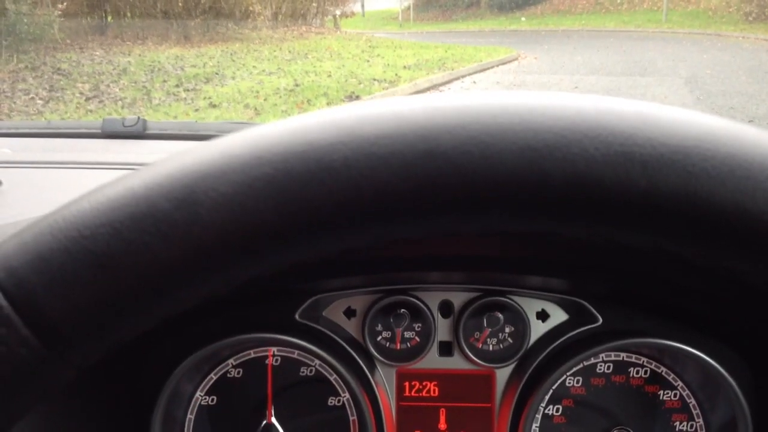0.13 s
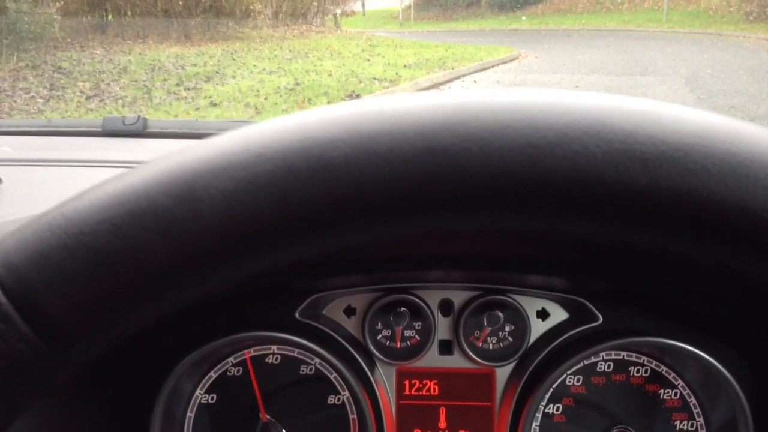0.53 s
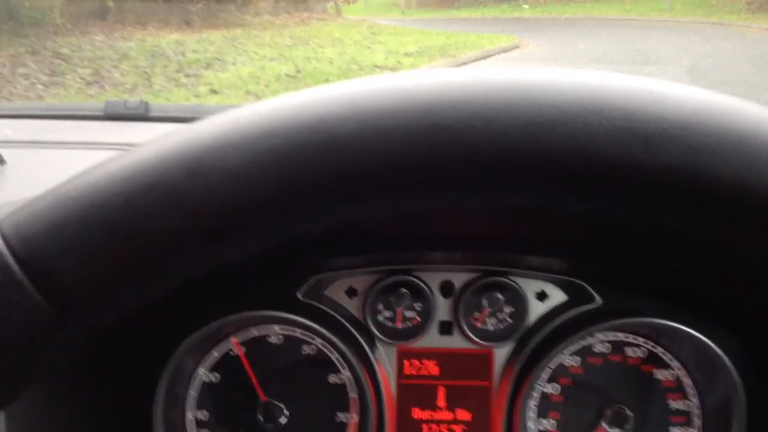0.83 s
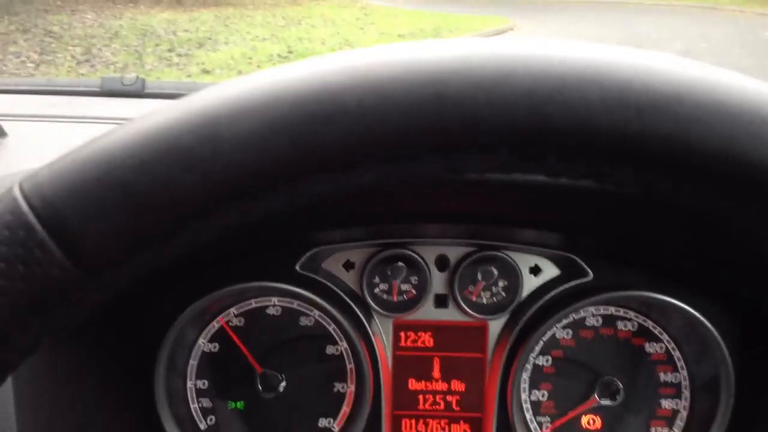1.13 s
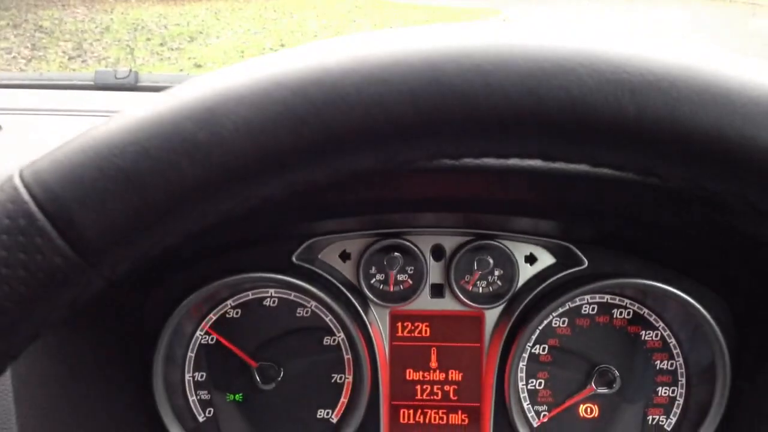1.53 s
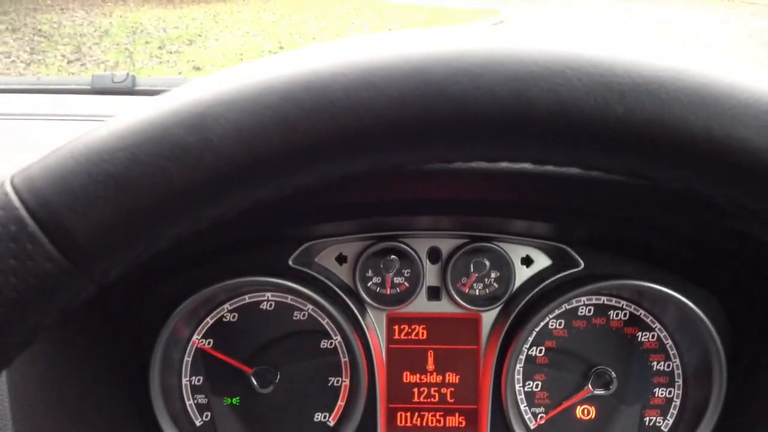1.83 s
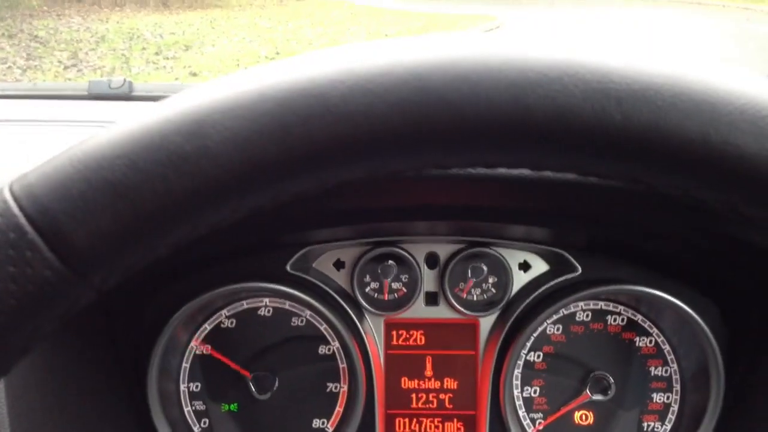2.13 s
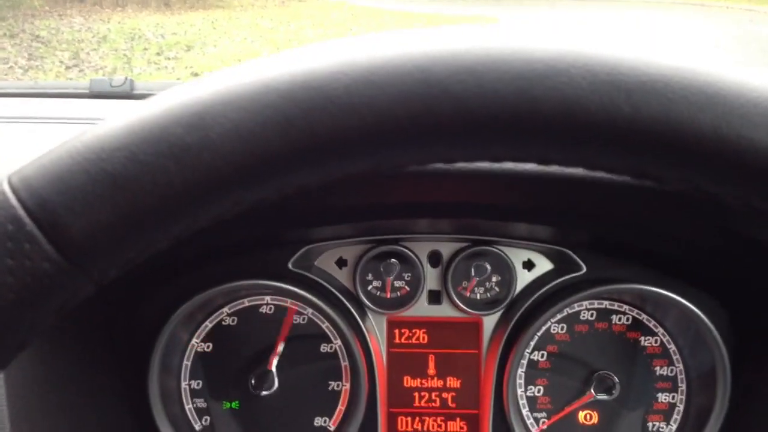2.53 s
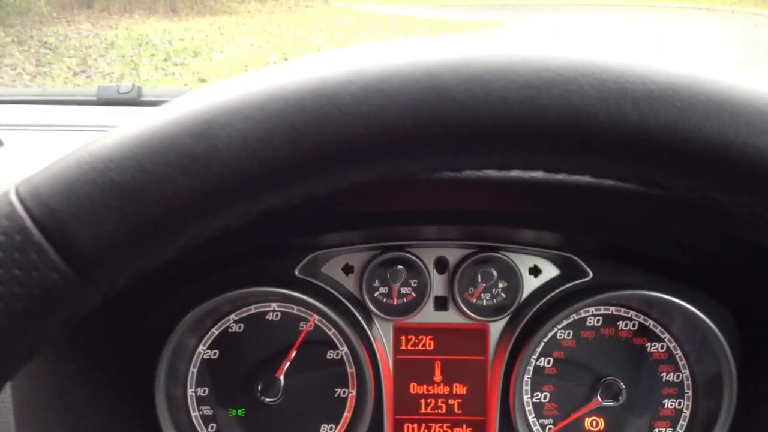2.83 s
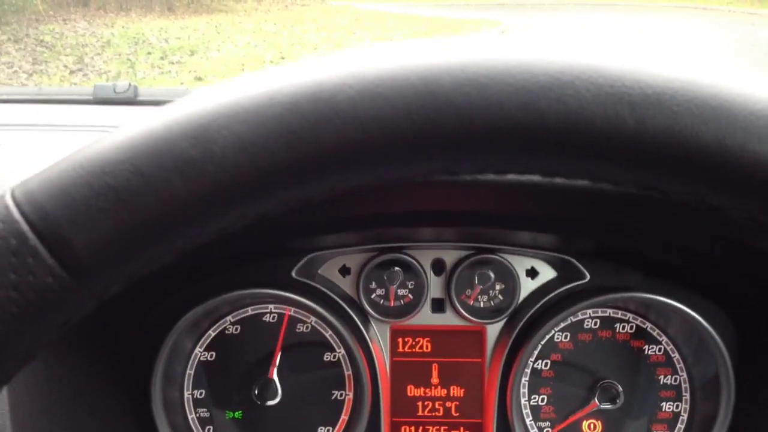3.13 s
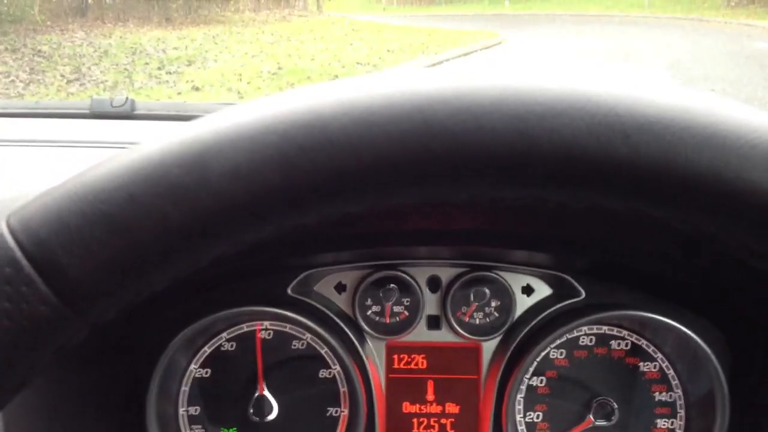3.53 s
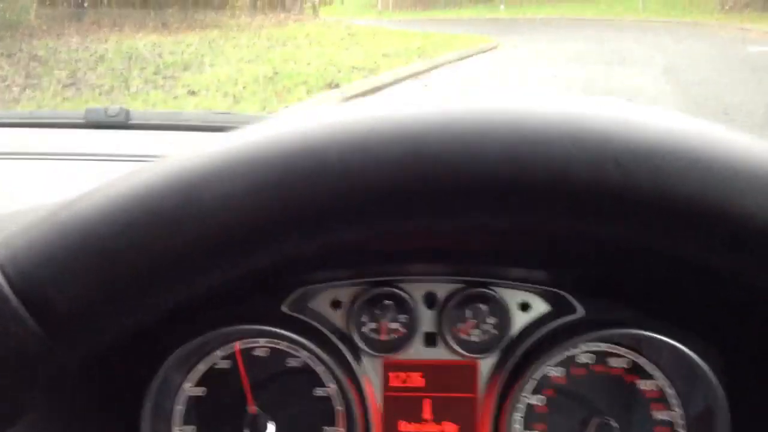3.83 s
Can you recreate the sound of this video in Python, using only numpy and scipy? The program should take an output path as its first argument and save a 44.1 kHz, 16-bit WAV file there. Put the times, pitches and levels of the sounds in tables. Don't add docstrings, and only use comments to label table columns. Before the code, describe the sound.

A muffled car engine coasts down and grumbles low, a pedal squeaks faintly, the revs surge into a roar, then a falling valve hiss and burbling coast-down, recorded in a small, boomy, enclosed cabin with slight microphone hiss.

```python
import sys
import numpy as np
from scipy import signal
from scipy.fft import rfft, irfft
from scipy.io import wavfile
from scipy.ndimage import uniform_filter1d

SR = 44100
rng = np.random.default_rng(int(sys.argv[2]) if len(sys.argv) > 2 else 0)


def gain_from_decibels(decibels):
    exponent = np.asarray(decibels, float) / 20
    return 10 ** exponent


def wrap_up_sound(samples):
    columns = np.atleast_2d(samples).T
    tamed = np.clip(columns, -1, 1)
    steps = np.round(tamed * 32767).astype(np.int16)
    wavfile.write(sys.argv[1], SR, steps)


N = 176400
T = np.arange(N) / SR


def evened(x):
    return x / np.sqrt(np.mean(x ** 2) + 1e-20)


def control(table, col):
    rows = np.array(table, float)
    return uniform_filter1d(np.interp(T, rows[:, 0], rows[:, col]), size=800)


def resonate(x, hz, width_hz):
    turn = np.exp(2j * np.pi * np.cumsum(hz * np.ones(len(x))) / SR)
    r = np.exp(-np.pi * width_hz / SR)
    return 2 * (turn * signal.lfilter([1 - r], [1, -r], x / turn)).real


def bank(x, peaks, glide=1):
    out = 0
    for hz, width_hz, level_db in peaks:
        once = resonate(x, hz * glide, width_hz)
        out = out + gain_from_decibels(level_db) * evened(resonate(once, hz * glide, width_hz))
    return out


def noise(points, patch_db=0):
    frames, hz = N // 256 + 5, np.fft.rfftfreq(1024, 1 / SR)
    real, imag, patch = rng.standard_normal((frames, 513, 3)).T
    patch = uniform_filter1d(patch, size=10, axis=0)
    patch = evened(uniform_filter1d(patch, size=12, axis=1))
    point_hz, point_db = np.transpose(points)
    level_db = np.interp(np.log(hz + 1), np.log(point_hz + 1), point_db, -90, -90)
    z = (real + 1j * imag) * gain_from_decibels(level_db[:, None] + patch_db * patch)
    return evened(signal.istft(z, nperseg=1024, noverlap=768)[1][:N])


def bump(start_s, length_s, skew=1):
    return np.sin(np.pi * np.clip((T - start_s) / length_s, 0, 1) ** skew) ** 2


def drift(hz, count):
    b, a = signal.butter(2, hz, fs=SR / 200)
    return evened(signal.lfilter(b, a, rng.standard_normal(count)))


# centre_hz, width_hz, level_db
CABIN_MODES = [(80, 16, -10.5), (135.7, 49.4, 1), (162.9, 9.8, 2), (207.1, 7.1, -8), (230.7, 15.3, 1),
               (255.7, 6.1, -1.5), (290, 22, -2.5), (347.6, 20.4, 3), (410.4, 52, -6.5), (533, 73, -12),
               (635, 64, -8), (699, 30, -16), (792, 44, -15.5), (877, 34, -6), (1400, 250, -21)]


def cabin_gain(hz):
    power = 0
    for centre_hz, width_hz, level_db in CABIN_MODES:
        power = power + gain_from_decibels(level_db) ** 2 / (1 + (2 * (hz - centre_hz) / width_hz) ** 2) ** 1.895
    return np.sqrt(power)


# time_s, level_db
FIRING = [(0.0, -32), (0.17, -29.5), (0.3, -40), (0.6, -36), (0.85, -41), (1.1, -40.5), (1.6, -49),
          (1.86, -50.5), (2.0, -39.5), (2.14, -32.5), (2.25, -30.5), (2.4, -27), (2.5, -28), (2.68, -26),
          (2.9, -32.5), (3.3, -36), (3.5, -38), (4.0, -38.5)]
# cycle_rate_multiple, coasting_db, pulling_db
ORDERS = [(2, -25, -31), (3, -18, -22), (4, 1, -3), (5, 6, 8), (6, -4, -2), (7, -18, -10), (8, -6, -7),
          (9, -19, -1), (10, -10, -3), (11, -15, -3), (12, -9, -8), (13, -13, -9), (14, -9, -8),
          (15, -12, -7), (16, -13, -6), (17, -14, -10), (18, -6, -12), (19, -15, -12), (20, -9, -10)]
# cycle_rate_multiple, start_s, length_s, lift_db
ORDER_SWELLS = [(4, -.1, .45, -4), (6, .3, 1, -9), (4, .45, .7, -4), (13, .12, .25, 6), (16, .7, .4, 5),
                (14, .6, .25, 5), (4, 2.33, .16, 7), (5, 2.33, .26, -8), (6, 2.1, .35, 4),
                (10, 2.33, .16, 5), (15, 2.1, .2, 4), (20, 2.33, .2, 6), (14, 2.48, .14, 5),
                (6, 2.68, .4, 7), (18, 2.76, .38, 7), (20, 2.7, .25, 5), (14, 2.7, .55, 5),
                (11, 2.95, .5, 5), (8, 2.8, .35, 4), (8, 3.15, .4, -7), (7, 3.15, .4, -5),
                (10, 2.55, .35, -4)]
WOBBLE_HZ, WOBBLE_DB, WOBBLE_DB_PER_ORDER = 7, 1, .07
ROUGH_HZ, ROUGH_DB_PER_ORDER = 30, .22
UPPER_ORDER, UPPER_DB_PER_OCT, UPPER_REF_HZ = 8, 7, 33


def orders(speed_hz, throttle):
    cycles, out = np.cumsum(speed_hz) / SR, np.zeros(N)
    step = slice(None, None, 200)
    t, speed, pull = T[step], speed_hz[step], throttle[step]
    for multiple, coasting_db, pulling_db in ORDERS:
        k, phase = round(multiple), rng.random()
        level_db = coasting_db + (pulling_db - coasting_db) * pull
        level_db += (WOBBLE_DB + WOBBLE_DB_PER_ORDER * k) * drift(WOBBLE_HZ, len(t))
        level_db += ROUGH_DB_PER_ORDER * k * pull * drift(ROUGH_HZ, len(t))
        if k > UPPER_ORDER:
            level_db += UPPER_DB_PER_OCT * np.log2(speed / UPPER_REF_HZ) * (1 - pull)
        for order, start_s, length_s, lift_db in ORDER_SWELLS:
            if order == k:
                level_db += lift_db * np.sqrt(bump(start_s, length_s)[step])
        gain = np.interp(T, t, gain_from_decibels(level_db) * cabin_gain(k * speed))
        out += gain * np.cos(2 * np.pi * (k * cycles + phase))
    return gain_from_decibels(control(FIRING, col=1)) * out


# centre_hz, width_hz, level_db
BODY_PANELS = [(136.7, 24.7, 6.5), (212, 21, -1), (290, 58, -1.5), (366.4, 51, -3), (456, 61, -6.5),
               (655.3, 77, -4.5), (872.3, 42, -14.5), (1335, 266, -13.5)]
# freq_hz, density_db
CLATTER_SPECTRUM = [(250, -43.5), (350, -1.5), (560, -6.5), (660, 1), (800, -11), (1400, -11.5),
                    (4500, -33.5), (15400, -46)]
# centre_hz, width_hz, level_db
INTAKE_MODES = [(232, 51, 3), (290, 20, 7.5), (377, 30, -5), (540, 67, -10.5), (647, 120, -11),
                (874, 52, -16.5)]
REF_HZ = 32.56
DRONE_DB, DRONE_DB_PER_OCT = -48.5, 7
CLATTER_DB, CLATTER_DB_PER_OCT, CLATTER_PULL_DB = -47, 15, 1
CLATTER_PATCH_DB, FIRING_DEPTH = 1.2, .3
INTAKE_DB, IDLE_THROTTLE = -39, .5


def engine_noise(speed_hz, throttle):
    octaves = np.log2(speed_hz / REF_HZ)
    firing = np.cos(2 * np.pi * 5 * np.cumsum(speed_hz) / SR)
    drone = gain_from_decibels(DRONE_DB + DRONE_DB_PER_OCT * octaves) * bank(rng.standard_normal(N), BODY_PANELS)
    clatter = noise(CLATTER_SPECTRUM, CLATTER_PATCH_DB) * (1 + FIRING_DEPTH * firing)
    clatter *= gain_from_decibels(CLATTER_DB + CLATTER_DB_PER_OCT * octaves + CLATTER_PULL_DB * throttle)
    opening = np.clip(throttle - IDLE_THROTTLE - 1e-3, 0, 1) * 2
    roar = gain_from_decibels(INTAKE_DB) * opening ** 1.22 * bank(rng.standard_normal(N), INTAKE_MODES)
    return drone + clatter + roar


# start_s, level_db
VENT_EVENTS = [
    (-.2, -61.5),
    (2.48, -58),
]
# centre_hz, width_hz, level_db
JET_MODES = [(8000, 2500, 2.5), (13800, 3500, -7.5)]
# freq_hz, density_db
DUCT_SPECTRUM = [(1500, -3), (2600, 9), (3250, 12), (4200, 7.5), (4700, 4.5), (5400, -1), (8500, -8.5),
                 (15400, -8)]
# centre_hz, width_hz, level_db
DUCT_MODES = [(3300, 220, -3.5), (4680, 110, -8), (5950, 500, -10), (13000, 4500, -12)]
VENT_RISE_S, VENT_HOLD_S, VENT_DB_PER_S = 0.036, 0.097, 78.5
VENT_SAG, VENT_SAG_S = .25, .12
DUCT_DB, DUCT_LINGER, RING_LINGER = 2.5, 0.25, .4


def dump_valve():
    out = np.zeros(N)
    for start_s, level_db in VENT_EVENTS:
        t = np.maximum(T - start_s, 0)
        rise = np.minimum(t / VENT_RISE_S, 1)
        fall_db = -VENT_DB_PER_S * np.maximum(t - VENT_RISE_S - VENT_HOLD_S, 0)
        sag = 1 - VENT_SAG * (1 - np.exp(-(t / VENT_SAG_S) ** 2))
        jet = gain_from_decibels(fall_db) * sum(bank(rng.standard_normal(N), [mode], sag) for mode in JET_MODES)
        hiss = gain_from_decibels(DUCT_DB + DUCT_LINGER * fall_db) * noise(DUCT_SPECTRUM, 1)
        ring = gain_from_decibels(RING_LINGER * fall_db) * bank(rng.standard_normal(N), DUCT_MODES)
        out += gain_from_decibels(level_db) * rise * (jet + hiss + ring)
    return out


# freq_hz, density_db
HISS_SPECTRUM = [(1000, 7), (1600, 3), (2500, -3), (4400, -8), (7200, -9), (10000, -14), (15400, 0)]
HISS_DB, RUMBLE_DB = -67.5, -79.5


def floor():
    rumble = evened(resonate(rng.standard_normal(N), 36, 40))
    return gain_from_decibels(HISS_DB) * noise(HISS_SPECTRUM, 0.7) + gain_from_decibels(RUMBLE_DB) * rumble


# start_s, level_db, pitch_hz, length_s
THUMPS = [(.4, -38.5, 154, 0.055), (0.921, -41, 130, 0.1), (.55, -49, 84, 0.068), (0.769, -52, 80, 0.032),
          (1.22, -45.5, 130, 0.091), (1.358, -33.5, 141.5, 0.074), (1.485, -36.5, 132, 0.039),
          (1.523, -35, 139, 0.036), (1.574, -32.5, 130, 0.089), (1.63, -46, 212, 0.13),
          (1.886, -40, 262.5, 0.047), (1.976, -34, 268, 0.037), (2.012, -31, 290, .04),
          (2.047, -32.5, 255.4, 0.041), (2.079, -36.5, 374.8, 0.066), (2.158, -31, 238.6, 0.055),
          (2.113, -21, 286, 0.054), (2.204, -20, 277.5, 0.092), (2.345, -32, 345, 0.043),
          (2.138, -40.5, 631, .05), (2.213, -39.5, 586, .05), (2.411, -41, 672, .09),
          (2.521, -36.5, 670, 0.031), (2.49, -40.5, 876, 0.098), (0.1, -46, 672, 0.11),
          (0.191, -46.5, 350.5, 0.17), (2.482, -44, 85, 0.035), (1.9, -46, 75, .07),
          (2.46, -32.5, 345, 0.12), (3.415, -28.5, 130, 0.061), (3.759, -34, 143.3, 0.072),
          (3.95, -37, 132.6, 0.045)]
# start_s, length_s, level_db
GRUMBLES = [
    (0.21, 0.94, -55),
    (1.29, 0.55, -53),
    (2.46, .08, -67),
    (3.34, 0.67, -53),
]
# centre_hz, width_hz, level_db
PIPE_MODES = [(49.4, 4.2, -12), (80, 30, 2), (130, 64, 4.5)]
ATTACK_SKEW = .7


def burbles(speed_hz):
    cycles, thumps, grumble = np.cumsum(speed_hz) / SR, np.zeros(N), np.zeros(N)
    for start_s, level_db, pitch_hz, length_s in THUMPS:
        multiple = pitch_hz / speed_hz[int(start_s * SR)]
        tone = np.sin(2 * np.pi * multiple * cycles)
        thumps += gain_from_decibels(level_db) * bump(start_s, length_s, ATTACK_SKEW) * tone
    for start_s, length_s, level_db in GRUMBLES:
        grumble += gain_from_decibels(level_db) * bump(start_s, length_s) ** 0.13
    return np.sqrt(2) * thumps + grumble * bank(rng.standard_normal(N), PIPE_MODES)


# start_s, length_s, level_db
SCRAPES = [
    (1.752, .02, -71),
    (1.817, 0.022, -70),
    (2.217, 0.06, -58.5),
    (2.479, 0.024, -55),
    (3.138, 0.023, -67),
]
# freq_hz, density_db
SCRAPE_SPECTRUM = [(3000, -14), (4500, 8.5), (6000, 4), (8500, -4), (10000, 3.5), (13000, -3.5),
                   (15200, -0.5)]
# start_s, length_s, level_db, start_hz, end_hz
HINGE_SQUEAKS = [(1.81, .016, -71, 4930, 4500), (1.823, 0.022, -67, 4200, 3960),
                 (2.22, 0.022, -55, 3890, 4660), (2.233, 0.018, -56.5, 4450, 4930),
                 (2.222, .014, -61, 8000, 8640), (2.229, .012, -63, 8500, 8200),
                 (2.236, .017, -55, 7140, 7100), (2.234, 0.012, -63, 12850, 12700),
                 (2.242, .015, -67, 12400, 12200), (2.249, 0.009, -61, 6400, 5800),
                 (2.261, 0.012, -62, 7800, 8100), (2.279, 0.012, -61, 4800, 4660),
                 (2.289, 0.015, -63, 4750, 4660)]


def pedal():
    scrape = np.zeros(N)
    for start_s, length_s, level_db in SCRAPES:
        scrape += gain_from_decibels(level_db) * np.sqrt(bump(start_s, length_s))
    out = scrape * noise(SCRAPE_SPECTRUM)
    for start_s, length_s, level_db, start_hz, end_hz in HINGE_SQUEAKS:
        hz = start_hz + (end_hz - start_hz) * np.clip((T - start_s) / length_s, 0, 1)
        tone = np.cos(2 * np.pi * np.cumsum(hz) / SR)
        flutter = 1 + .3 * evened(uniform_filter1d(rng.standard_normal(N), size=60))
        out += 0.87 * gain_from_decibels(level_db) * bump(start_s, length_s) * tone * flutter
    return out


# time_s, cycle_rate_hz
ENGINE_SPEED = [(0, 31.8), (.28, 29.4), (.6, 26.1), (.9, 22.9), (1.26, 19.5), (1.63, 16.3), (1.86, 15.1),
                (1.92, 16.6), (2.02, 22), (2.14, 27.6), (2.25, 33.2), (2.36, 39.4), (2.43, 42.2),
                (2.5, 43.4), (2.66, 41.6), (2.99, 36.3), (3.4, 31.6), (4, 26)]
# time_s, opening_0_to_1
THROTTLE_OPENING = [
    (0, 0),
    (1.64, 0),
    (1.68, .5),
    (1.885, .5),
    (1.91, .7),
    (2.15, 1),
    (2.3, .9),
    (2.45, .6),
    (2.55, 0),
    (4, 0),
]


def scene():
    speed_hz = control(ENGINE_SPEED, col=1)
    throttle = np.clip(control(THROTTLE_OPENING, col=1), 0, 1)
    engine = orders(speed_hz, throttle) + engine_noise(speed_hz, throttle)
    mix = engine + dump_valve() + floor() + burbles(speed_hz) + pedal()
    return mix[None]


# freq_hz, gain_db
MIC_RESPONSE = [(20, 4.5), (70, -2), (4750, 0.5), (5050, -3.5), (5700, -0.5), (8500, 2.5), (9900, -6),
                (12500, -4), (22050, -20)]


def microphone(x):
    freq_hz, gain_db = np.transpose(MIC_RESPONSE)
    log_hz = np.log(np.fft.rfftfreq(N, 1 / SR) + 1)
    return irfft(rfft(x) * gain_from_decibels(np.interp(log_hz, np.log(freq_hz), gain_db)), N)


def band_limit(x):
    return signal.sosfilt(signal.butter(12, 15200, fs=SR, output="sos"), x)


def record(dry):
    mix = microphone(dry)
    return band_limit(mix)


dry = scene()
out = record(dry)
wrap_up_sound(out)
```